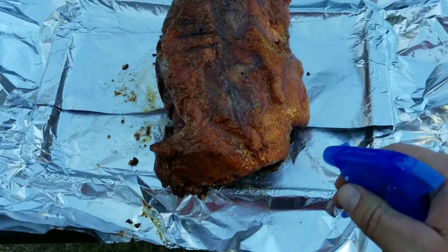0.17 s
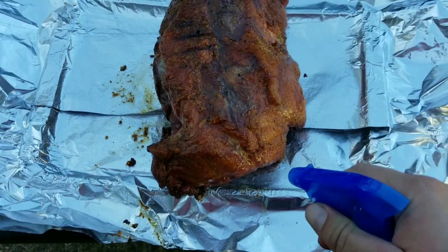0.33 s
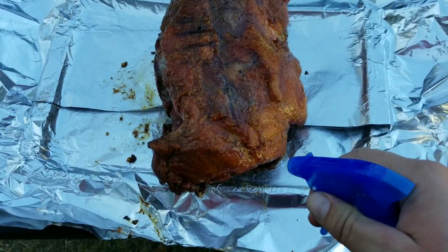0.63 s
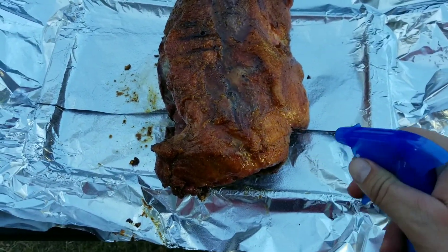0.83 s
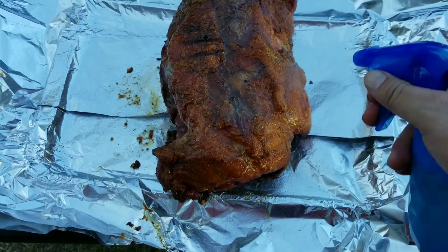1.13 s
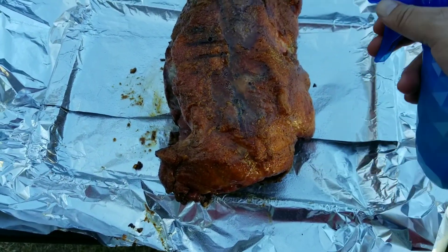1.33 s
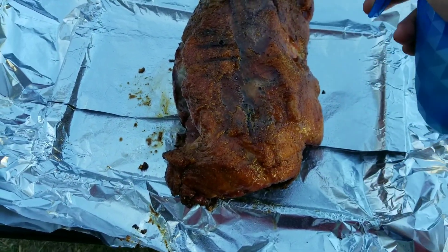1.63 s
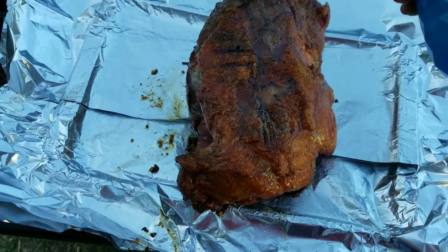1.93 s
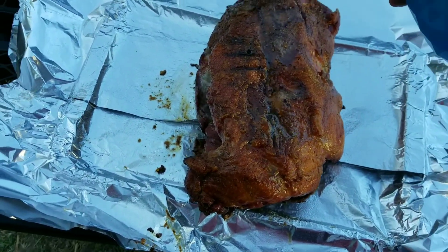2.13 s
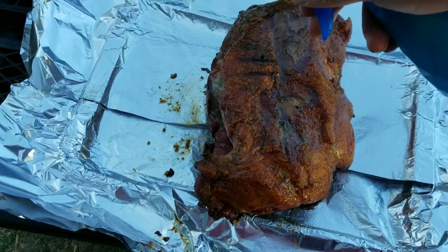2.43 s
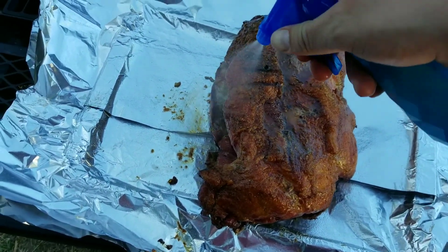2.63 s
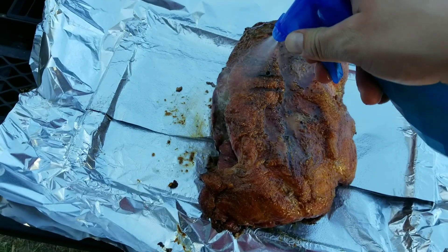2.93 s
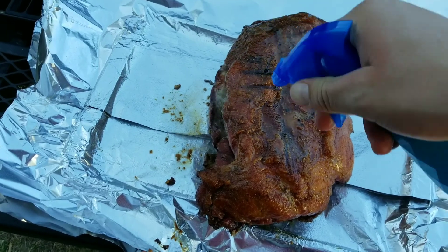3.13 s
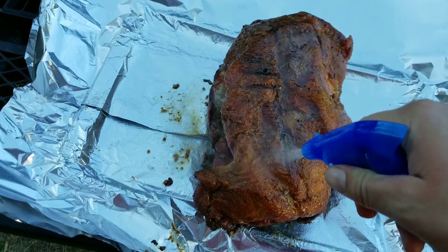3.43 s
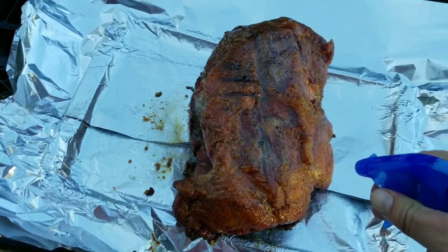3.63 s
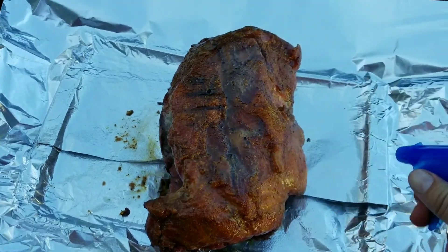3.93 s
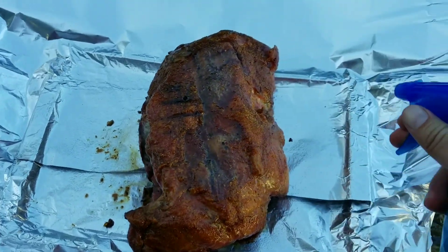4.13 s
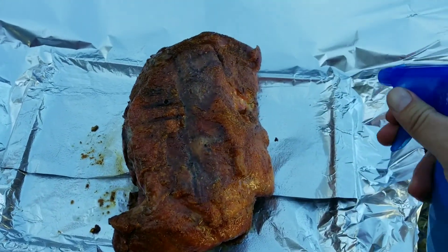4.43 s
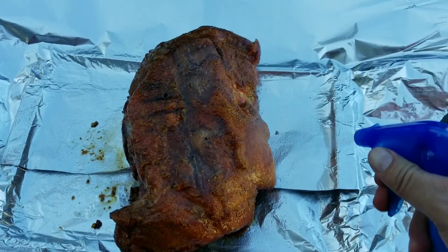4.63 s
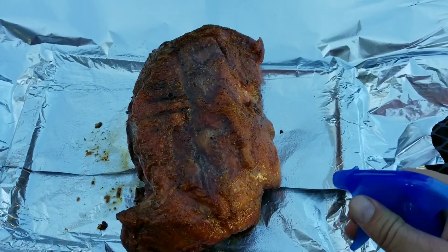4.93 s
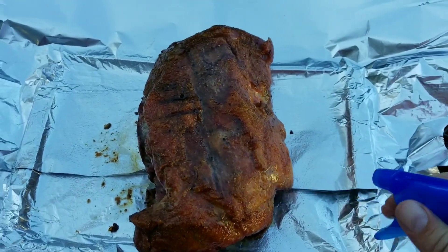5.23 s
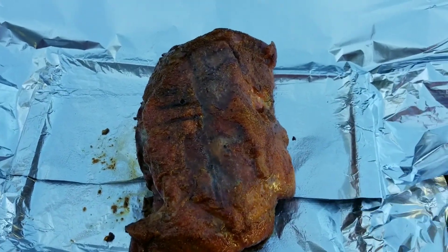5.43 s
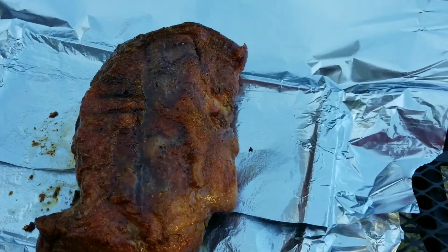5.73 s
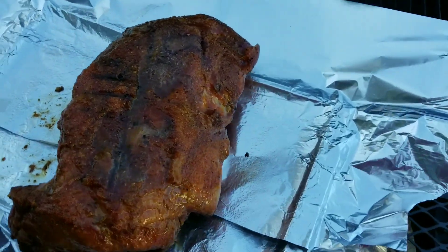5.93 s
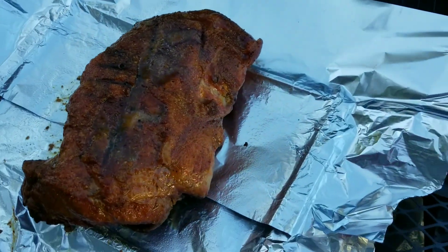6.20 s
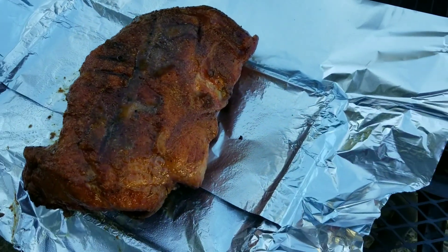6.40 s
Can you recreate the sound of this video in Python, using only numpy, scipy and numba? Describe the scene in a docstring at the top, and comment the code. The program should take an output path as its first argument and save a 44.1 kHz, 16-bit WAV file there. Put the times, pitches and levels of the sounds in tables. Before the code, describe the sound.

Outdoors, over a faint low engine drone and distant traffic, a hand mists a roast on foil with a plastic trigger sprayer near the microphone. Light clicks and short airy hisses alternate quickly for about five seconds, with droplets pattering softly on the foil. Then come quiet handling sounds: cloth rustling, small plastic taps, one sharper click and some dull knocks on a hollow table.

```python
"""Trigger sprayer over foil

Outdoors, a hand pumps a plastic sprayer thirteen times over a roast on foil. At each squeeze the trigger
ticks, a turbulent jet hisses, mist patters on the foil and liquid gurgles in the pump head. A distant
engine drones; at the end a sleeve rustles, the bottle taps the hand and bumps ring a hollow table."""
import sys
import numpy as np
from scipy import signal
from scipy.fft import rfft, irfft
from scipy.io import wavfile
from scipy.ndimage import uniform_filter1d, map_coordinates
from numba import njit

SR = 44100
rng = np.random.default_rng(int(sys.argv[2]) if len(sys.argv) > 2 else 0)


def digitize_waveform(pressure):
    """Quantize a signal to 16-bit integers and store it at the path in sys.argv[1].

    Rows of a 2-D input are taken as channels; values are limited to [-1, 1].
    """
    field = np.atleast_2d(pressure).T
    bounded = np.clip(field, -1, 1)
    quanta = np.round(bounded * 32767).astype(np.int16)
    wavfile.write(sys.argv[1], SR, quanta)


N = 289365
T = np.arange(N) / SR
F = np.maximum(np.arange(N // 2 + 1) * SR / N, 1)


def undb(db):
    """Amplitude ratio of a level in decibels."""
    return 10 ** (np.asarray(db, float) / 20)


def along(points):
    """Interpolation of (f/Hz, value) points over logarithmic frequency."""
    hz, value = np.transpose(points)
    return np.interp(np.log(F), np.log(hz), value)


def columns(rows):
    """Linear interpolation of (t/s, values...) rows at every sample."""
    s, *curves = np.transpose(rows)
    return [np.interp(T, s, curve) for curve in curves]


def flutter(rate_hz):
    """Low-pass random modulation: held values smoothed twice, deviation near 1."""
    hold = int(SR / rate_hz)
    held = np.repeat(rng.standard_normal(N // 20 + 1)[:N // hold + 1], hold)
    return 1.3 * uniform_filter1d(uniform_filter1d(held, hold), hold)[:N]


# Coherence of the two microphone ports: f/Hz, coherence (0-1)
COHERENCE = [(30, 0.94), (70, 1), (200, 0.93), (600, 0.37), (1500, 0.51), (2200, 0.23), (3500, 0),
             (5000, 0), (12500, 0.05), (14500, 0.5)]


def noise(gain, grain_db=0., grain_hz=2000.):
    """Partly coherent two-port noise of rms 1, shaped by gain; grain_db makes it a swarm of grains."""
    hold = int(SR / grain_hz)
    grains = np.repeat(rng.exponential(size=N // 2 + 1)[:N // hold + 1], hold)[:N]
    mid, side = rfft(undb(grain_db * grains) * rng.standard_normal((2, N)))
    coherence = along(COHERENCE)
    mid, side = mid * np.sqrt(1 + coherence), side * np.sqrt(1 - coherence)
    out = irfft(gain * np.array([mid + side, mid - side]), N)
    return out / np.sqrt(np.mean(out ** 2))


def band(hz, width_hz):
    """Lorentzian spectral gain: a resonance applied twice."""
    return 1 / (1 + (2 * (F - hz) / width_hz) ** 2)


@njit
def resonator(x, hz, width_hz):
    """State-variable band-pass with unit gain at its moving centre frequency."""
    y, band_state, low_state = np.empty(len(x)), 0., 0.
    for i in range(len(x)):
        g, damping = np.tan(np.pi * hz[i] / SR), width_hz / hz[i]
        v = (band_state + g * (x[i] - low_state)) / (1 + g * (g + damping))
        band_state, low_state = 2 * v - band_state, low_state + 2 * g * v
        y[i] = damping * v
    return y


def ring(modes, t, upper_db=0.):
    """Free vibration: damped modes of random strength, all but the first shifted by upper_db."""
    strength = undb(0.82 * rng.standard_normal(len(modes)))
    return sum(undb(db + upper_db * (k > 0)) * strength[k] * np.sin(2 * np.pi * hz * t)
               * 1000. ** (-t / t60) for k, (hz, db, t60) in enumerate(modes))


def swell(s, db, rise_db_s, fall_db_s):
    """Exponential growth to level db at time s, then exponential decay."""
    return undb(db - np.where(T < s, rise_db_s * (s - T), fall_db_s * (T - s)))


def pan(db):
    """Gains for a balance db, the left level minus the right."""
    return undb(np.vstack([db, -db]) / 2)


def delay(x, ms):
    """Propagation delay, interpolated between samples."""
    return map_coordinates(x, [(T - ms / 1000) * SR], order=3, mode="nearest")


def add(out, s, sound):
    """Superposition of a short sound at time s."""
    i = int(s * SR)
    out[:, i:i + sound.shape[1]] += sound[:, :N - i]


# Distant engine: t/s, f/Hz, drone level/dB, rumble level/dB
ENGINE = [(0.0, 58.6, -78, -50.5), (0.25, 55.9, -57, -49.5), (1.02, 55.1, -69, -52),
          (1.41, 54.9, -50, -54.5), (1.6, 58, -56, -53), (2.19, 56.9, -60, -51), (2.5, 59.5, -51, -54),
          (3.45, 59.23, -51.5, -55.5), (3.8, 58.5, -49.5, -51), (4.18, 77.4, -53, -55.5),
          (4.58, 79.7, -46, -48.5), (4.9, 79.46, -62.5, -54), (5.61, 87, -61, -53.5),
          (5.99, 85.4, -63, -58), (6.17, 82.1, -51, -46.5), (6.3, 86.8, -60, -55.5),
          (6.56, 84.6, -57, -54.5)]
# Rumble spectrum: f/Hz, relative level/dB
RUMBLE_SPECTRUM = [(13, -38), (22, 3), (37, -8.5), (65, 9.5), (146, -2), (241, -10.5), (300, -12.5),
                   (411, -17.5), (450, -19), (500, -15.5), (650, -41), (1100, -120)]


def engine():
    """A tone modulated in frequency and amplitude wavers over low rumbling noise."""
    hz, drone_db, rumble_db = columns(ENGINE)
    phase = 2 * np.pi * np.cumsum(hz * (1 + 0.016 * flutter(12))) / SR
    lead_rad = np.array([[-.3], [.3]])  # the tone reaches the right port first
    drone = np.sqrt(2) * np.sin(phase + lead_rad) * undb(drone_db + 1.5 * flutter(12))
    return drone + noise(undb(along(RUMBLE_SPECTRUM))) * undb(rumble_db + 1.5 * flutter(8))


# Distant sounds: t/s, traffic level/dB, hum level/dB, hiss level/dB
DISTANT_LEVELS = [(0, -56.5, -60.5, -76), (.25, -54.5, -62, -68), (.5, -58, -77, -85),
                  (.8, -60, -56.5, -87), (1.25, -69, -80, -81), (1.7, -70, -58, -70), (2.1, -77, -58, -63),
                  (2.5, -72, -59.5, -72), (2.9, -65, -68.5, -64), (3.3, -79, -60.5, -69),
                  (3.6, -85, -70, -85), (4.4, -56, -64, -77), (5, -75.5, -69, -86), (5.5, -78, -69, -81),
                  (6.56, -67, -83, -80)]
# Open-air spectrum: f/Hz, relative level/dB
AIR_SPECTRUM = [(180, -34), (300, -3), (494, -21), (584, 0.5), (1210, -6), (3080, -18), (3400, -24),
                (4910, -15), (5160, -26), (16000, -11)]


def garden():
    """Ambient noise: bands of traffic, hum, hiss and whine come and go over a broadband floor."""
    traffic_db, hum_db, hiss_db = columns(DISTANT_LEVELS)
    hum = noise(band(hz=471, width_hz=150)) * undb(hum_db)
    hiss = noise(band(hz=2300, width_hz=1700)) * undb(hiss_db)
    traffic = noise(band(hz=193, width_hz=130)) * undb(traffic_db)
    whine = noise(band(hz=1700, width_hz=90)) * undb(hiss_db - 6.5)
    air = noise(undb(along(AIR_SPECTRUM))) * undb(-68 + 0.31 * flutter(2.12))
    return hum + hiss + traffic + whine + air


# Pump strokes: peak t/s, hiss level/dB, rise/s, fall/s, trail after peak/s, trail level/dB, patter re hiss/dB,
# gurgle re hiss/dB, settling mist level/dB, murmur level/dB until the next stroke, sizzle gain/dB, balance/dB,
# f/Hz of the hollow under the nozzle, its gain/dB, left port delay/ms
PUMP_STROKES = [(.345, -40.5, .065, 0.11, 0.041, -48, -9.5, -18, -66.5, -70, -5, 1, 2160, -9, 0.022),
                (0.678, -34, 0.062, 0.1, 0.078, -47.5, -18, -20, -64.5, -62.5, -9, 0, 4500, -12, 0.031),
                (1.07, -47, .1, 0.11, .065, -69, -7, -9, -73, -92, -7, -1, 3370, 7.5, 0.068),
                (1.412, -38, 0.086, .13, .12, -49, -5.5, -15.5, -61, -60.5, -14, -1.5, 2900, 0, 0.071),
                (1.814, -34.5, 0.11, 0.16, 0.12, -47, -6, -15, -52, -61.5, -10, -0.5, 2800, -11, 0.032),
                (2.196, -36.5, 0.088, .16, 0.16, -49, -6, -13.5, -66, -73, -9, 0.5, 2702, -2, -0.036),
                (2.6, -32, .11, 0.15, 0.16, -42.5, -5, -16, -63, -62, -20, 2, 2960, 0, -0.13),
                (3.02, -34.5, .1, 0.11, 0.14, -45, -5, -13, -61, -59, -12, 1.5, 3001, 6.5, -0.12),
                (3.417, -33.5, 0.1, 0.11, 0.12, -58.5, -4, -13.5, -65.5, -66.5, -8, 1.5, 3250, -13, -0.11),
                (3.832, -33, 0.099, .11, 0.13, -43, -7, -11, -67, -67, -8, 1, 3300, -0.5, 0.055),
                (4.281, -33, 0.099, 0.12, 0.15, -39, -4, -16.5, -53.5, -53.5, -14, 0.5, 2880, -14, .02),
                (4.663, -34.5, .082, .12, 0.055, -53, -6, -13, -60.5, -62.5, -14, 0.5, 3098, 3, 0.03),
                (5.004, -46, 0.064, 0.18, 0.12, -57, -2, -3.5, -64.5, -65, -5, 1.5, 3000, -20, 0.036)]
# Dry spits of air as the valve cracks open: t/s, level/dB
AIR_SPITS = [(0.27, -41.5), (.31, -43), (.632, -47), (.99, -50.5), (1.314, -43.5), (1.698, -48.5),
             (2.042, -66), (5.282, -58.5)]


def pump_envelopes():
    """Incoherent powers add: pressure hump, weak trail and decay set hiss, patter and gurgle gains."""
    power = np.zeros((3, N))
    power[2] = undb(-63) ** 2 * (T < PUMP_STROKES[0][0])  # a faint murmur near 1.6 kHz before the first stroke
    ends = [row[0] for row in PUMP_STROKES[1:]] + [T[-1]]
    follow = np.vstack([1, 0.939, 0.79])  # share of a pressure drop that each layer follows
    wet_db = np.vstack([0, 4, -0.5])  # the trail is wetter
    firm_db_s, stop_db_s = 21, 450  # the trail firms up as the trigger bottoms out, then the valve shuts
    leak_db, linger_db_s = -65.5, np.vstack([107, 70, 30])  # leak, mist and murmur die away
    for stroke, end in zip(PUMP_STROKES, ends):
        s, db, rise, fall, trail, trail_db, patter_db, gurgle_db, mist_db, murmur_db = stroke[:10]
        span = slice(int((s - 2 * rise) * SR), int(end * SR))
        t = T[span] - s
        drop_db = 32 * np.where(t < 0, np.abs(t / rise) ** 2.8, np.abs(t / fall) ** 1.87)
        drop_db += 3.5 * np.clip((-0.75 * rise - t) / 0.0044, 0, 1)  # until the valve pops fully open
        layer_db = np.vstack([0, patter_db, gurgle_db])
        shut_s = np.maximum(t - trail, 0)
        eased_db = trail_db - firm_db_s * np.maximum(trail - t, 0) - stop_db_s * shut_s
        linger_db = np.vstack([leak_db, mist_db, murmur_db]) - linger_db_s * shut_s
        power[:, span] += undb(db + layer_db - follow * drop_db) ** 2
        power[:, span] += (t > 0) * (undb(eased_db + layer_db + wet_db) ** 2 + undb(linger_db) ** 2)
    power[0] += sum(swell(s, db, rise_db_s=4000, fall_db_s=356) ** 2 for s, db in AIR_SPITS)
    return np.sqrt(power)


# Nozzle jet spectrum: f/Hz, relative level/dB
JET_SPECTRUM = [(1500, -15), (3500, -5.5), (6000, -1.5), (9000, -0.5), (12500, -1), (16000, -2.5)]
# Spectrum of drops on foil: f/Hz, relative level/dB
FOIL_SPECTRUM = [(500, -14), (1200, -11), (1900, -3), (2400, 0.5), (3000, -3), (4500, -0.5), (7000, -7.5),
                 (12000, -19)]
# Pump head cavities: f/Hz, bandwidth/Hz, relative level/dB
HEAD_CAVITIES = [(517, 150, -26), (770, 590, -4), (1394, 550, -3.5), (1607, 190, 0.5), (4200, 200, -21)]


def sprayer():
    """Jet turbulence, drop impacts on foil and cavity resonance of the pump head as liquid is forced in."""
    hiss, patter, gurgle = pump_envelopes()
    aim = [(row[0], *row[10:]) for row in PUMP_STROKES]
    sizzle_db, pan_db, hollow_hz, hollow_db, late_ms = columns(aim)
    jet = noise(undb(along(JET_SPECTRUM)), grain_db=1.5, grain_hz=3000) * undb(1.2 * flutter(90))
    # the top of the hiss is stronger when the nozzle faces the listener
    sizzle = signal.sosfilt(signal.butter(2, 11200, "high", fs=SR, output="sos"), jet)
    jet += undb(sizzle_db) * sizzle
    drops = noise(undb(along(FOIL_SPECTRUM)), grain_db=1, grain_hz=1500)
    # the gap under the nozzle rings and shifts as the hand shakes
    gap_hz = hollow_hz * (1 + .04 * flutter(25))
    drops += undb(hollow_db) * np.array([resonator(side, gap_hz, width_hz=580.) for side in drops])
    # the wet spot moves, so the left port hears it early or late
    shared = 0.1  # part of the hiss common to both ports
    jet[0] = np.sqrt(1 - shared) * jet[0] + np.sqrt(shared) * delay(jet[1], late_ms)
    drops[0] = delay(drops[0], late_ms)
    drops *= undb(1.16 * flutter(60))
    # the foil reflects the hiss one period of the gap later
    jet += undb(-18) * np.array([delay(side, 1000 / gap_hz) for side in jet])
    cavities = np.sqrt(sum((undb(db) * band(hz, width)) ** 2 for hz, width, db in HEAD_CAVITIES))
    head = noise(cavities, grain_db=2, grain_hz=360) * undb(1.05 * flutter(29.86))
    return (jet * hiss + drops * patter + head * gurgle) * pan(pan_db)


# Trigger and hinge ticks: t/s, level/dB, relative treble/dB, balance/dB
TRIGGER_TICKS = [(0.22, -22.5, -21, -5), (0.61, -25.5, -16, -2.5), (0.965, -32, -9.5, -2),
                 (0.987, -25, -4.5, -1.5), (1.076, -33, -3, -2), (1.132, -36, 4.5, 2), (1.168, -43, -4, 0),
                 (1.296, -39.5, -6, -6), (1.702, -40, -7, -14), (2.456, -45, -8, -11),
                 (2.468, -40.5, -7.5, -14), (2.898, -38, -7, -9), (3.693, -49, -4.5, -16),
                 (4.551, -38, -8.5, -7), (4.561, -34, -6.5, -8), (4.8, -40.5, -1, -1),
                 (4.927, -32, -7, -2.5), (5.181, -41, -2, -3.5), (5.211, -37, -7, -5),
                 (5.285, -38.5, -1.5, -4), (5.651, -26.5, -5.5, -6), (6.148, -19, -8, 1)]
# Trigger modes: f/Hz, relative level/dB, T60/s
TRIGGER_MODES = [(1820, -7.5, 0.012), (2080, -4, 0.008), (3490, -3.5, 0.0037), (1794, -25.5, 0.063)]


def trigger_ticks():
    """Impact excitation: plastic parts knock and bounce once, ringing their modes under a bright crack."""
    out, t = np.zeros((2, N)), T[:1500]
    highpass = signal.butter(2, 3000, "high", fs=SR, output="sos")
    attack = 1 - np.exp(-(t / 0.00073) ** 2)
    for s, db, treble_db, pan_db in TRIGGER_TICKS:
        body = np.sqrt(max(1 - undb(treble_db + 6.5) ** 2, 0.02))  # what the crack leaves to the modes
        for late_s, bounce_db in ((0, 0.5), (.002, -6)):
            crack = signal.sosfilt(highpass, rng.standard_normal((2, len(t)))) * np.exp(-t / 0.001)
            knock = 1.1 * body * ring(TRIGGER_MODES, t) + 1.28 * undb(treble_db) * crack
            add(out, s + late_s, knock * attack * undb(db + bounce_db) * pan(pan_db))
    return out


# Nozzle wheezes: t/s, Gaussian deviation/s, f/Hz, bandwidth/Hz, level/dB
NOZZLE_WHEEZES = [(0.272, 0.0042, 12100, 900, -57), (0.322, 0.008, 7060, 600, -50),
                  (0.38, 0.0061, 11000, 1200, -46), (0.378, 0.013, 12700, 1000, -41),
                  (0.379, 0.008, 7000, 500, -45), (0.676, 0.0064, 4560, 240.7, -33),
                  (0.68, 0.01, 12700, 1200, -37), (0.683, 0.014, 10400, 800, -39.5),
                  (1.078, .02, 14500, 1500, -52), (1.319, 0.0025, 12960, 5556, -43),
                  (1.406, 0.032, 1570, 250, -47.5)]


def nozzle_wheezes():
    """Narrow-band resonance: air trapped in the nozzle sings briefly during the first strokes."""
    return sum(noise(band(hz, width)) * undb(db) * np.exp(-.5 * ((T - s) / length) ** 2)
               for s, length, hz, width, db in NOZZLE_WHEEZES)


# Cloth spectrum: f/Hz, relative level/dB
CLOTH_SPECTRUM = [(150, -16), (250, 2), (301, -14), (346, -2.5), (994, -1.5), (1130, -9), (1360, -5.5),
                  (4000, -18.5), (5200, -49), (8800, -120)]
# Sleeve and hand movements: peak t/s, level/dB, rise/(dB/s), fall/(dB/s), relative treble/dB, balance/dB
SLEEVE_MOVES = [(5.435, -58.5, 232, 270, -6.5, 0), (5.63, -55.5, 218, 137, 0, -2.5),
                (5.876, -56, 308, 90, -9.5, 0), (5.96, -58.5, 98, 90, -11, -3),
                (6.064, -45, 1200, 220, -12, -4.5), (6.11, -52, 203, 197, -8.5, 5),
                (6.148, -41.5, 900, 247, -7.5, 4.5), (6.2, -53, 200, 330, -11.5, 2),
                (6.468, -77, 82, 133, 6, -6)]


def sleeve_rustle():
    """Friction noise: cloth drags in uneven grains."""
    low = noise(undb(along(CLOTH_SPECTRUM)), grain_db=1.6, grain_hz=210)
    treble_shape = np.minimum(F / 3500, 1) ** 3 / (1 + (F / 9000) ** 2)
    high = noise(treble_shape, grain_db=1.93, grain_hz=790)
    out = sum((low + high * undb(treble_db)) * swell(s, db, rise, fall) * pan(pan_db)
              for s, db, rise, fall, treble_db, pan_db in SLEEVE_MOVES)
    return out * undb(1.3 * flutter(50))


# Taps of the bottle against the hand: t/s, level/dB, f/Hz, T60/s, balance/dB
BOTTLE_TAPS = [(5.424, -46.5, 1707, 0.039, -6), (5.424, -49, 776, 0.035, -4), (5.864, -37, 900, 0.036, -2),
               (6.147, -33, 754, 0.057, 6), (6.15, -36, 1020, 0.08, -3)]


def bottle_taps():
    """Damped oscillation: each tap rings one mode of the hollow bottle."""
    out, t = np.zeros((2, N)), T[:4000]
    attack = np.minimum(t / 0.00077, 1)
    for s, db, hz, t60, pan_db in BOTTLE_TAPS:
        add(out, s, ring([(hz, db, t60)], t) * attack * pan(pan_db))
    return out


# Bumps: t/s, level/dB, push time/s, upper mode gain/dB, share of T60 left by the hand (0-1), balance/dB
TABLE_BUMPS = [(6.059, -32, 0.004, 7, 0.99, -3), (6.076, -46, 0.0067, 0, 0.8, -6),
               (6.15, -36.5, 0.0066, 0.5, 0.7, 2), (6.2, -43, 0.0091, -9, 0.76, -10),
               (6.411, -35.5, 0.0072, -28, 0.38, -15), (6.43, -32.5, 0.0033, -9, 0.29, -18.5)]
# Modes of the hollow table: f/Hz, relative level/dB, T60/s
TABLE_MODES = [(77.3, 4, 0.25), (225, -0.5, 0.27), (344, -12, 0.1), (525, -20, 0.11), (727, -21, .15)]


def table_bumps():
    """Modal damping: soft pushes ring the hollow table, and a resting hand shortens the decay."""
    out, t = np.zeros((2, N)), T[:20000]
    for s, db, push_s, upper_db, free, pan_db in TABLE_BUMPS:
        modes = [(hz, mode_db, t60 * free) for hz, mode_db, t60 in TABLE_MODES]
        body = ring(modes, t, upper_db) * (1 - np.exp(-t / push_s))
        add(out, s, body * undb(db) * pan(pan_db))
    return out


def scene():
    """Linear superposition of all sources at the microphone."""
    handheld = sprayer() + nozzle_wheezes() + trigger_ticks() + bottle_taps()
    return handheld + sleeve_rustle() + table_bumps() + engine() + garden()


# Left port response: f/Hz, gain/dB
LEFT_RESPONSE = [(100, -0.5), (300, -6.5), (1500, -4), (5000, 0.5), (7000, -1), (9000, 5), (12500, 5),
                 (15500, 0)]
# Right port response: f/Hz, gain/dB
RIGHT_RESPONSE = [(100, -1.5), (1500, 1), (5000, 3), (7000, 6), (9000, -0.5), (12000, 6.5), (15000, 4.5)]


def record(dry):
    """Acoustic shadowing: the housing colours each port in its own way; a low-pass cuts the top."""
    ports = irfft(rfft(dry) * undb([along(LEFT_RESPONSE), along(RIGHT_RESPONSE)]), N)
    return signal.sosfilt(signal.ellip(10, .2, 70, 15900, fs=SR, output="sos"), ports)


dry = scene()
out = record(dry)
digitize_waveform(out)
```